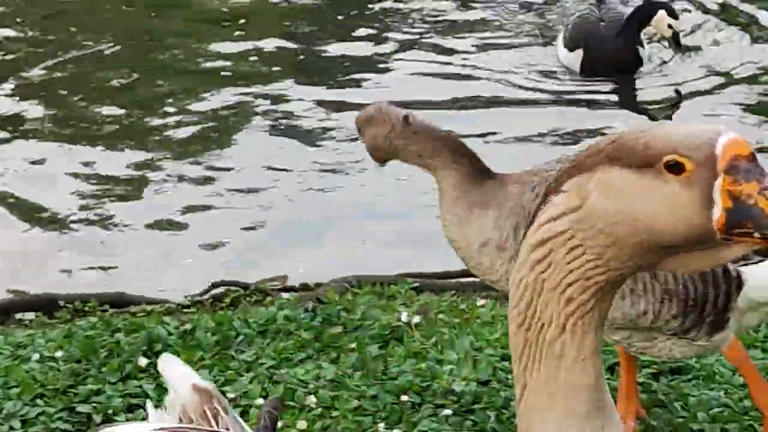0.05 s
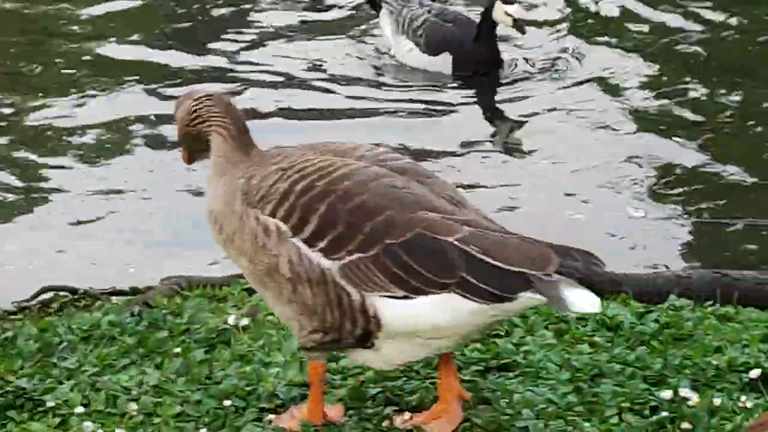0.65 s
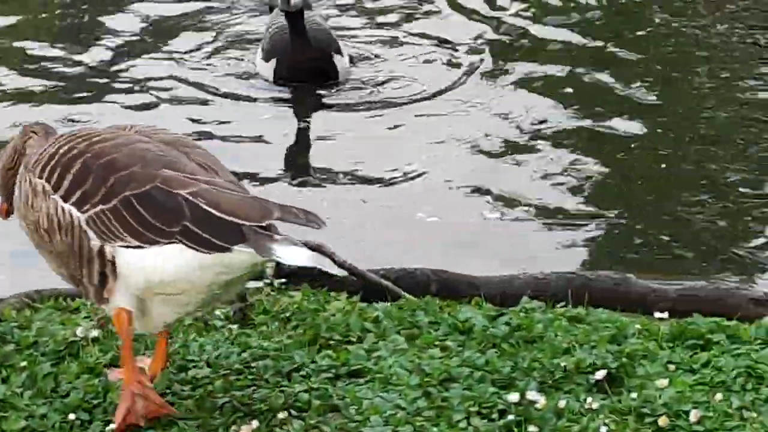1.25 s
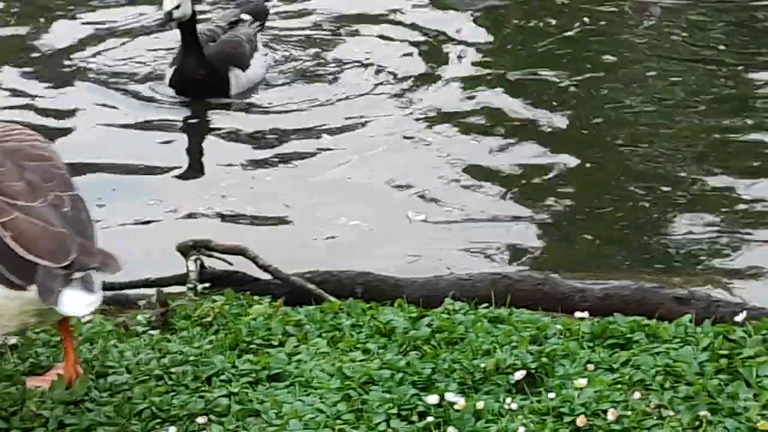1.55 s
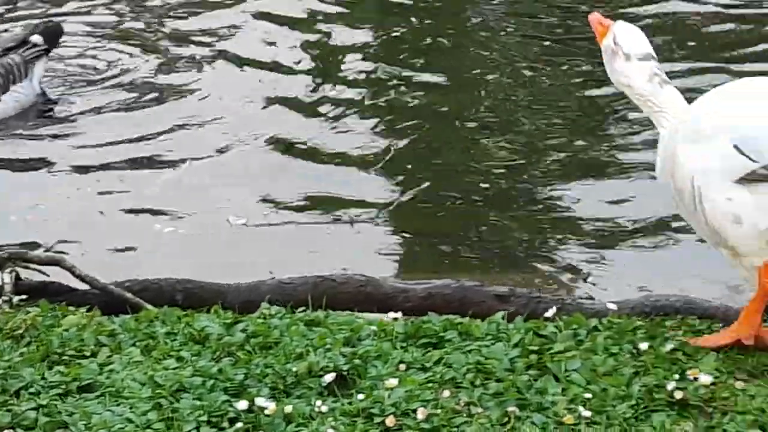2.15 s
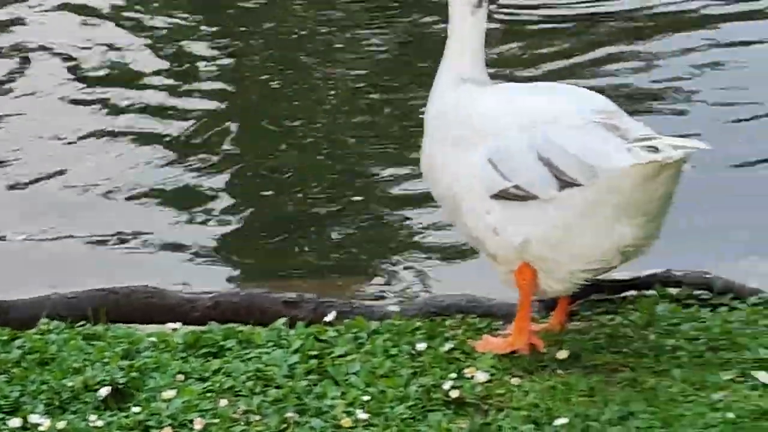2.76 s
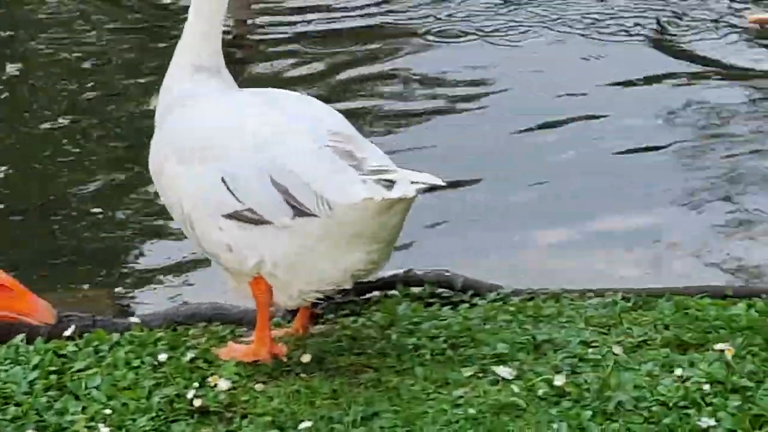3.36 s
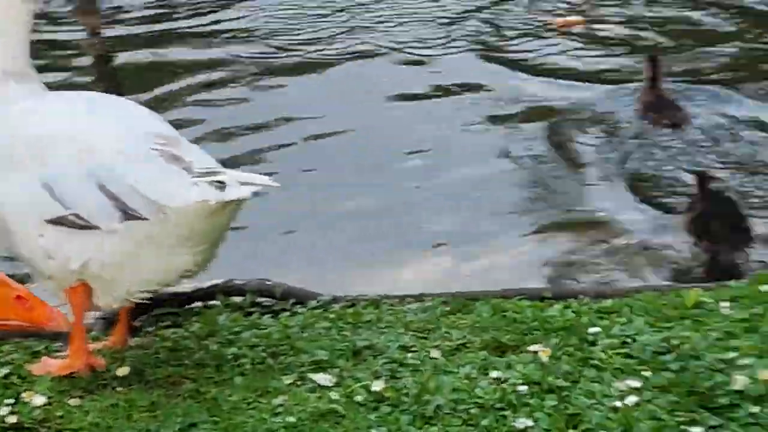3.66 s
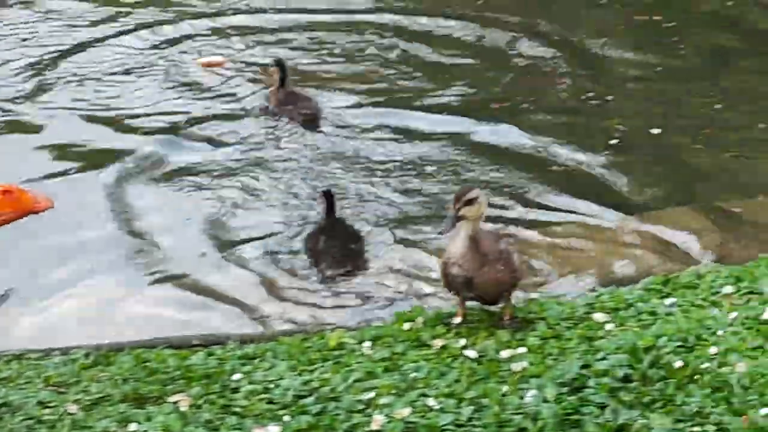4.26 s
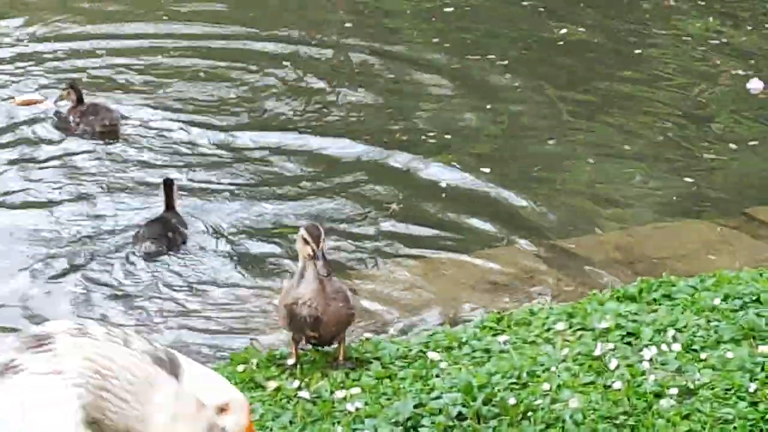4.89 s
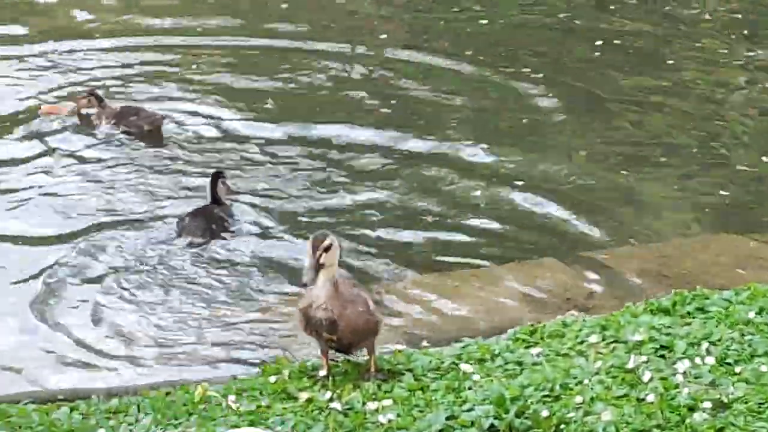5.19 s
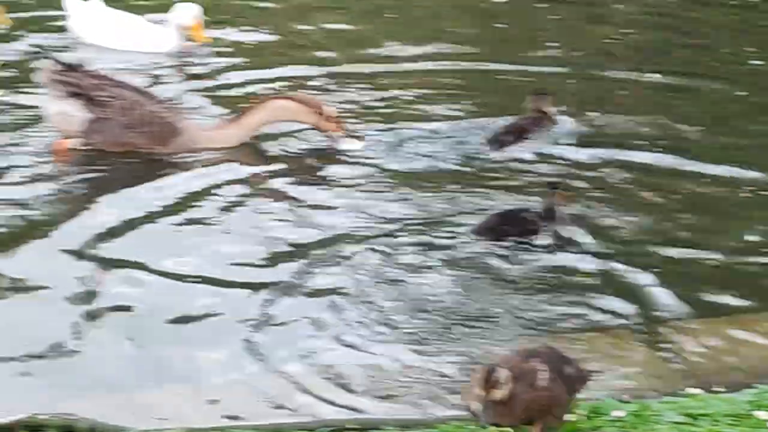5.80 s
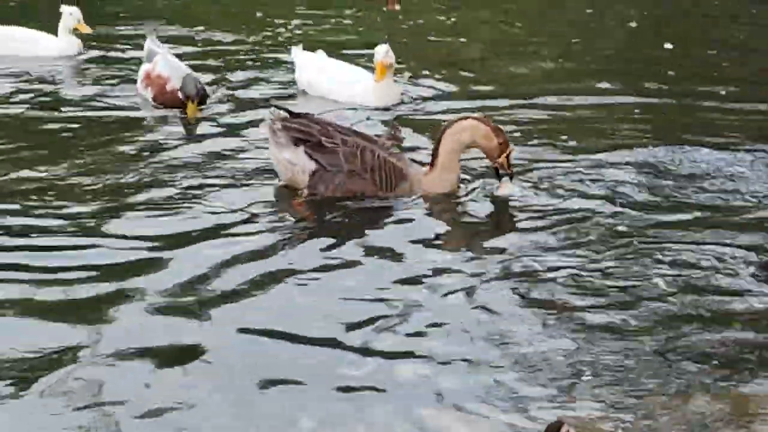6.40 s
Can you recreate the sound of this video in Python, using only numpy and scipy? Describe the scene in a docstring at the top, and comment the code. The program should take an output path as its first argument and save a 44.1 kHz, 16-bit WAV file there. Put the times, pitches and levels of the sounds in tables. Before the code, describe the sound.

An even outdoor hiss fills a park pond throughout, with a low rumble of distant traffic beneath it. For the first three seconds, scattered small drips and sharp watery ticks sound over faint lapping, the sharpest near 0.8 and 1.4 seconds. A few soft gulps come from the bank around 3 seconds. At about 3.4 seconds a duckling, off to the right, begins quick, high, slightly raspy peeps, each falling at its end. Ten come evenly, three or four a second, until 6 seconds, loudest at first and then more distant. From 3.7 seconds, ducklings paddle and dabble with a light bubbly wash, and drips cluster around 4.5 and 5.5 seconds. A larger water bird gives one short, quiet low note at about 5.1 seconds. A couple more drips and a last faint peep near 6.5 seconds finish it.

```python
"""A duckling gives a run of quick high peeps at a park pond, the harmonics of its syrinx filtered by
the resonances of throat and bill. Other ducklings paddle and dabble, and water laps, drips and gulps
at the bank as trapped air bubbles ring. A larger water bird gives one low note.
Distant traffic rumbles under an even outdoor hiss."""
import sys
import numpy as np
from scipy import signal
from scipy.fft import rfft, irfft
from scipy.io import wavfile
from scipy.ndimage import uniform_filter1d

SR = 44100
rng = np.random.default_rng(int(sys.argv[2]) if len(sys.argv) > 2 else 0)


def digitize_waveform(pressure):
    """Quantize a signal to 16-bit integers and store it at the path in sys.argv[1].

    Rows of a 2-D input are taken as channels; values are limited to [-1, 1].
    """
    field = np.atleast_2d(pressure).T
    bounded = np.clip(field, -1, 1)
    quanta = np.round(bounded * 32767).astype(np.int16)
    wavfile.write(sys.argv[1], SR, quanta)


N = 292824
TIME = np.arange(N) / SR
BINS = np.fft.rfftfreq(N, 1 / SR)
EAR_LAG_S = .00034   # sound from the pond reaches the right ear later
CUTOFF_HZ = 15800


def from_db(db):
    """Amplitude ratio of a level in decibels."""
    return 10 ** (np.asarray(db) / 20)


def rms_one(x):
    """Normalisation to unit rms."""
    return x / np.sqrt(np.mean(x ** 2) + 1e-20)


def in_time(rows, t=TIME):
    """Linear interpolation of each column of a curve at the times t."""
    s, *columns = np.transpose(rows)
    return [np.interp(t, s, column) for column in columns]


def at_hz(points, hz):
    """Interpolation of a spectrum on a log-frequency axis."""
    known_hz, values = np.transpose(points)
    return np.interp(np.log(np.maximum(hz, 1)), np.log(known_hz), values)


def bell(hz, centre_hz, octaves):
    """A Gaussian band of height 1 on a log-frequency axis."""
    return np.exp(-(np.log2(np.maximum(hz, 1) / centre_hz) / octaves) ** 2)


def coloured(x, spectrum):
    """Linear filtering by a spectrum in dB, at unit rms."""
    return rms_one(irfft(rfft(x) * from_db(at_hz(spectrum, BINS)), N))


def drift(rate_hz):
    """Random fluctuation: low-passed noise of unit rms."""
    return rms_one(irfft(rfft(rng.standard_normal(N)) / (1 + (BINS / rate_hz) ** 2), N))


def panned(x, pan_db):
    """Interaural level difference: left exceeds right by pan_db."""
    return x * from_db(np.array([[.5], [-.5]]) * pan_db)


def delayed(x, lag_s):
    """Propagation delay."""
    return np.interp(TIME - lag_s, TIME, x)


def stereo_noise(coherence):
    """Partly coherent white noise at two ears; coherence is one value or one per bin."""
    mid, side = rfft(rng.standard_normal((2, N)))
    return irfft(np.sqrt(1 + coherence) * mid + np.sqrt(1 - coherence) * side * [[1], [-1]], N)


def add(out, s, sound):
    """Superposition of a sound starting at s seconds."""
    at = max(int(s * SR), 0)
    out[..., at:at + sound.shape[-1]] += sound[..., :max(N - at, 0)]


def traffic():
    """A distant source gives a low rumble that is almost coherent at the two ears."""
    # Each row: frequency in Hz, relative spectral density in dB.
    spectrum = [(20, -6), (36, -16), (55, 4), (75, 1), (120, 1.5), (160, 1), (185, -5), (240, -5.5),
                (320, -13), (450, -23), (900, -71)]
    # Each row: time in seconds, relative level in dB.
    loudness = [(0, -47.5), (.6, -50.5), (1.3, -49.5), (1.7, -50), (3.0, -50.5), (4.4, -48), (5.0, -51.5),
                (5.7, -52.5), (6.3, -49)]
    return coloured(stereo_noise(0.97), spectrum) * from_db(in_time(loudness)[0] - 2.5)


def comb_gain(hz, t):
    """Interference with a close, inverted reflection; the small surface returns only treble."""
    # The echo shifts as the listener turns. Each row: time in seconds, delay in seconds, strength 0-1.
    reflection = [(0, .00042, 0.1), (.4, .000405, 0), (.85, 0.00037, 0.6), (1.35, 0.00039, 0.6),
                  (1.55, .00038, 0), (2.6, 0.00049, .03)]
    above_hz = 7300
    lag_s, strength = in_time(reflection, t)
    treble = hz ** 4 / (hz ** 4 + above_hz ** 4)
    return 1 - strength * treble * np.exp(-2j * np.pi * hz * lag_s)


def hollow_and_shade_gain(hz, t):
    """Resonance of a hollow and acoustic shadowing, both changing as the listener turns."""
    # Each row: resonance in Hz, half width in octaves, full gain in dB.
    resonances = [(4340, 0.035, 7), (5500, 0.049, 6)]
    # Each row: time in seconds, share of that gain from 0 to 1.
    hollowness = [(0, 1), (.65, 0.7), (1.4, 0.7), (1.6, 0.2)]
    # Each row: time in seconds, treble gain in dB.
    treble = [(0, -2), (.9, 6.5), (1.7, 4), (2.6, 8), (3.9, 6.5), (4.5, -2), (5.2, -8), (5.6, -7),
              (5.95, 8)]
    hollow_db = sum(gain_db * bell(hz, centre, width) for centre, width, gain_db in resonances)
    treble_db = in_time(treble, t)[0] * bell(hz, centre_hz=10900, octaves=0.27)
    return from_db(in_time(hollowness, t)[0] * hollow_db + treble_db)


def band_swell_db(hz, t):
    """Slow amplitude modulation of four separate bands of the hiss."""
    # One curve per band. Each row: time in seconds, gain at the band's centre in dB.
    middle = [(1.0, 6), (3.0, 4.5), (4.6, -2.5), (5.5, -7.5), (6.2, 3.5)]
    presence = [(0, -2.5), (.7, -1), (1.1, 3.5), (1.6, 3.5), (2.1, 2.5), (3.0, 3.5), (4.5, -1.5), (5.6, -3),
                (6.64, 1.5)]
    bright = [(.6, -4.5), (.85, 2), (1.6, 3.5), (2.6, -1), (3.9, -3), (4.5, 1.5), (5.2, -5), (5.65, -0.5),
              (6.64, -5)]
    air = [(0, 0.5), (2.0, -2), (2.9, 2), (4.4, 0), (5.3, 4.5), (6.3, -2.5)]
    return (in_time(middle, t)[0] * bell(hz, centre_hz=1240, octaves=0.33)
            + in_time(presence, t)[0] * bell(hz, centre_hz=3080, octaves=0.11)
            + in_time(bright, t)[0] * bell(hz, centre_hz=6770, octaves=0.18)
            + in_time(air, t)[0] * bell(hz, centre_hz=9600, octaves=0.14))


def hiss():
    """Broadband noise of the park, filtered by what lies near each ear of a turning listener."""
    # Each row: frequency in Hz, coherence between the ears from 0 to 1.
    coherence = [(300, 0.83), (700, 1), (1200, 0.027), (3000, 0.28), (7000, 0.073), (15000, 0.45)]
    # One spectrum per ear. Each row: frequency in Hz, relative spectral density in dB.
    left_spectrum = [(150, -5), (280, -7), (450, -3.5), (700, 0), (1500, -3), (1800, -3), (2050, -9),
                     (2380, 7), (2650, -8.5), (2950, 3.5), (3300, -7.5), (3800, -1.5), (4250, -4.5),
                     (5200, -4.5), (6300, -1), (7300, -5), (8050, -4.5), (8900, -8.5), (11000, -12),
                     (15500, -16.5)]
    right_spectrum = [(150, -5.5), (280, -5.5), (450, -11), (700, -1), (1130, -7), (1500, -2), (1900, 0),
                      (2350, -2), (2650, -2.5), (2930, 0), (3170, -2), (3500, 2.5), (4020, -2.5), (4380, 0),
                      (5850, -1), (6220, 1.5), (7050, -3.5), (7700, -5.5), (8400, -7), (11000, -21.5),
                      (15500, -16.5)]
    # Each row: time in seconds, relative level in dB.
    loudness = [(0, -48.5), (1.2, -49), (1.7, -49.5), (2.8, -49), (4.4, -47.5), (5.0, -47.5), (5.6, -49),
                (6.64, -48.5)]
    patchy_db, flutter_db = 1.3, 0.93
    left, right = stereo_noise(at_hz(coherence, BINS))
    left = coloured(left, left_spectrum) * from_db(2.5)
    right = coloured(np.roll(right, int(EAR_LAG_S * SR)), right_spectrum) * from_db(7.5)
    hz, t, spectra = signal.stft([left, right], SR, nperseg=2048)
    hz = hz[:, None]
    spectra[0] *= comb_gain(hz, t)
    spectra[1] *= hollow_and_shade_gain(hz, t)
    patches = uniform_filter1d(rng.standard_normal(spectra.shape), size=12, axis=1)
    patches = rms_one(uniform_filter1d(patches, size=14, axis=2))   # the colour shifts irregularly
    spectra *= from_db(band_swell_db(hz, t) + patchy_db * patches)
    noise = signal.istft(spectra, SR)[1][:, :N]
    return noise * from_db(in_time(loudness)[0] + flutter_db * drift(21.0))


def bubble(hz, cycles, rise):
    """A damped oscillator: a bubble loses 30 dB in `cycles` periods and sharpens near the surface."""
    age = np.arange(int(2 * cycles / hz * SR)) / SR * hz / cycles
    phase = 2 * np.pi * cycles * (age + rise * age ** 2 / 2)
    onset = 1 - np.exp(-2 * age * cycles)
    return np.sin(phase) * from_db(-30 * age) * onset


def bubbling(curve, count, low_hz, high_hz, cycles):
    """Superposition of random bubbles under a level curve; large ones ring lower, longer and softer."""
    out = np.zeros((2, N))
    for when, smallness, strength, place in rng.random((count, 4)):
        hz = low_hz * (high_hz / low_hz) ** smallness
        ring = bubble(hz, cycles, rise=0.093) * strength ** 2 * np.sqrt(hz / low_hz)
        add(out, when * N / SR, panned(ring, 10 * (place - .5)))
    out[1] = delayed(out[1], EAR_LAG_S)
    return rms_one(out) * from_db(in_time(curve)[0])


def lapping():
    """Air entrainment: water lapping at the bank traps heavily damped bubbles."""
    # Each row: time in seconds, relative level in dB.
    loudness = [(0, -69), (1.3, -66), (1.7, -61.5), (2.8, -62), (4.3, -58), (5.2, -64.5), (6.0, -56.5),
                (6.64, -67)]
    return from_db(6.5) * bubbling(loudness, count=2600, low_hz=607, high_hz=2290, cycles=4.7)


def paddling():
    """Paddling feet entrain small resonant bubbles and stir a surging wash of noise."""
    # The ducklings come near and pass. Each row: time in seconds, relative level in dB.
    loudness = [(0, -60), (3.3, -78), (3.7, -49), (4.1, -51), (4.5, -46.5), (4.64, -48.5), (4.8, -44.5),
                (5.0, -51.5), (5.5, -45.5), (6.2, -55.5), (6.45, -50), (6.64, -64)]
    # Each row: frequency in Hz, relative spectral density in dB.
    wash_spectrum = [(900, -44), (1350, -6), (1700, 7.5), (2300, -0.5), (2850, -12), (3450, 7.5),
                     (3850, -3), (4400, -2), (5500, 0.5), (7000, -22), (15000, -18)]
    surge_db = 1.8
    bubbles = bubbling(loudness, count=1500, low_hz=1390, high_hz=2560, cycles=9.7)
    wash = coloured(stereo_noise(0.033), wash_spectrum)
    wash *= from_db(in_time(loudness)[0] + surge_db * drift(12.0))
    return panned(from_db(-3.5) * bubbles + from_db(0.3) * wash, pan_db=-7.0)


def drops():
    """Impact and resonance: a drop or a dabbing bill splashes briefly and leaves a ringing bubble."""
    # Each row: start in seconds, relative level in dB, resonance in Hz.
    impacts = [(0.121, -42.5, 1500), (.404, -42, 1850), (0.4407, -38, 2400), (.4574, -37, 2900),
               (.667, -42, 1390), (.88, -41.5, 1520), (1.004, -46, 1130), (1.036, -42, 1400),
               (1.139, -43, 1950), (1.31, -43, 3200), (1.4, -33, 3000), (1.787, -37.5, 2880),
               (2.689, -37, 2410), (4.472, -38, 2270), (4.4944, -32, 2300), (4.581, -32.5, 2100),
               (4.916, -39, 1900), (5.147, -42, 1880), (5.376, -40, 2100), (5.407, -38, 2120),
               (5.427, -36.5, 2290), (5.465, -37.5, 1810), (5.5, -36, 2420), (5.619, -45, 2070),
               (5.661, -38, 2150), (5.708, -40, 1830), (5.727, -39, 1800), (6.1901, -38, 2330),
               (6.297, -37, 2270)]
    splash_share, splash_decay_s = 0.3, 0.0024
    out = np.zeros(N)
    for s, level_db, hz in impacts:
        ring = bubble(hz, cycles=19.6, rise=0.022)
        band = signal.butter(2, [hz / 2, hz * 2], "band", fs=SR, output="sos")
        noise = rms_one(signal.sosfilt(band, rng.standard_normal(SR // 10)))[:len(ring)]
        splash = splash_share * noise * np.exp(-TIME[:len(ring)] / splash_decay_s)
        add(out, s, from_db(level_db + 4.0) * (ring + splash))
    return panned(out, pan_db=-2.8)


def ticks():
    """Sharp ticks and small spatters are transients: short bursts of band-limited noise."""
    # Each row: start in seconds, relative level in dB, band centre in Hz, decay time in seconds.
    spatters = [(.1594, -35.5, 3570, 0.00083), (.2404, -43, 5400, .0007), (.5556, -38, 3500, .001),
                (.5634, -42, 5200, 0.0006), (.8122, -27.5, 4000, 0.00085), (3.908, -54, 12100, 0.011),
                (4.239, -35, 2290, 0.0013), (4.282, -52, 10500, .006), (4.412, -30, 1550, 0.0011),
                (4.5, -51, 12000, .007)]
    out = np.zeros((2, N))
    for s, level_db, hz, decay_s in spatters:
        age = TIME[:SR // 8] / decay_s
        burst = stereo_noise(0.29)[:, :SR // 8] * 2 * age * np.exp(-age)
        band = signal.butter(3, [hz / 1.6, min(hz * 1.55, CUTOFF_HZ)], "band", fs=SR, output="sos")
        add(out, s, from_db(level_db + 7.5) * signal.sosfilt(band, burst))
    return panned(out, pan_db=-5)


def gulps():
    """Cavity resonance: an air pocket closing at the bank rises in pitch as it dies away."""
    # Each row: start in seconds, first and last pitch in Hz, length in seconds, level in dB.
    pockets = [(0.649, 760, 910, 0.061, -47.5), (2.812, 630, 765, 0.043, -46.5),
               (2.911, 1264, 1430, 0.037, -45), (2.965, 237, 264, 0.041, -39.5),
               (2.999, 289, 693, 0.063, -46), (3.091, 626, 654, 0.019, -43.5),
               (3.917, 520, 587, 0.025, -50)]
    decay_db = 13.3
    out = np.zeros(N)
    for s, start_hz, end_hz, length_s, level_db in pockets:
        age = np.linspace(0, 1, int(length_s * SR))
        phase = 2 * np.pi * np.cumsum(start_hz * (end_hz / start_hz) ** age) / SR
        envelope = from_db(level_db - decay_db * age) * signal.windows.tukey(len(age), .3)
        add(out, s, envelope * np.sin(phase))
    return out


def register_flips(t, pitch, level_db):
    """Register change: the voice jumps to a thin, warbling high note and cracks on dropping back."""
    # Each row: start in seconds, length in seconds, pitch in Hz, relative level in dB.
    flips = [(3.368, 0.025, 3490, -34.5), (3.389, 0.024, 3390, -31), (3.41, 0.017, 3470, -35),
             (3.434, 0.013, 3333, -34), (3.689, .022, 3090, -43.5), (3.954, 0.03, 2860, -46)]
    flip_s, swell_s = 0.0023, 0.0051
    warble_hz, warble_depth = 48.2, 0.015
    crack_s, crack_hz, crack_depth = 0.0138, 112, 0.185
    for s, length_s, high_hz, high_db in flips:
        since, after = t - s, t - s - length_s
        flipped = np.clip(np.minimum(since, -after) / flip_s + .5, 0, 1)
        effort = np.clip(since / swell_s, 0, 1) * np.clip(1 - after / crack_s, 0, 1)
        warbling = high_hz * (1 - warble_depth * np.cos(2 * np.pi * warble_hz * since))
        crack = np.sin(2 * np.pi * crack_hz * np.maximum(after, 0))
        cracked = pitch * (1 - crack_depth * effort * crack)
        pitch = cracked + flipped * (warbling - cracked)
        level_db = level_db + effort * (high_db - level_db)
    return pitch, level_db


def peep(start, hold_s, fall_s, top_hz, held_db, falling_db, held_bright_db, falling_bright_db):
    """Frequency and amplitude modulation of one peep: a scoop, hold and fall, as a call for voice()."""
    # The fall eases on a ledge midway. Each row: share of its length, share of the top pitch.
    fall = [(0, 1), (.27, .92), (.42, .8), (.8, .71), (1, .56)]
    # The voice catches and its level dips. Each row: time in seconds, half length in seconds.
    catches = [(3.388, .0025), (3.407, 0.0034), (3.486, 0.0023), (3.673, 0.015), (3.694, 0.0026),
               (3.939, .006), (4.495, 0.0072), (4.758, .003), (4.78, .004), (4.797, .003), (5.05, 0.011),
               (5.34, .005), (5.938, 0.0063)]
    scoop_depth, scoop_s, climb = .3, .005, 0.0339
    attack_s, fade_db, catch_db = 0.0054, 7.5, 2
    release_share, fade_share = 0.15, 0.39   # of the fall's length
    age = np.arange(0, hold_s + fall_s, 1 / SR)
    t = start + age
    fallen = np.clip((age - hold_s) / fall_s, 0, 1)
    pitch = top_hz * (1 - scoop_depth * np.exp(-age / scoop_s)) * in_time(fall, fallen)[0]
    pitch *= 1 - climb * np.maximum(1 - age / hold_s, 0)
    released = np.minimum(fallen / release_share, 1)
    bright_db = held_bright_db + (falling_bright_db - held_bright_db) * released
    opening = np.maximum(1 - age / attack_s, 0)
    closing = np.maximum(1 - (1 - fallen) / fade_share, 0)
    level_db = held_db + (falling_db - held_db) * released - fade_db * (opening + closing)
    pitch, level_db = register_flips(t, pitch, level_db)
    level_db -= catch_db * sum(np.exp(-((t - s) / half_s) ** 2) for s, half_s in catches)
    return np.column_stack([t, pitch, level_db, bright_db])


def voice(calls, throat, roughness, wander, jitter, shimmer_db, rasp):
    """Source and filter: harmonics of the syrinx sweep through the resonances of the throat."""
    overtone_loss_db = 4.5   # per harmonic above the second
    waver = 1 + wander * drift(39.7)
    tremor = jitter * drift(306)
    flutter_db = shimmer_db * np.tanh(drift(130))
    turbulence = coloured(rng.standard_normal(N), throat)
    k = np.arange(1, 9)[:, None]
    flicker_db = 6 * np.array([drift(70) for _ in k])   # each harmonic flickers on its own
    out = np.zeros(N)
    for call, rough in zip(calls, roughness):
        # Each row of a call: time in seconds, pitch in Hz, level in dB, brightness in dB per harmonic.
        span = (TIME >= call[0][0]) & (TIME <= call[-1][0])
        pitch, level_db, bright_db = in_time(call, TIME[span])
        pitch = uniform_filter1d(pitch, size=130) * (waver[span] + rough * tremor[span])
        source_db = bright_db * np.minimum(k - 1, 2) - overtone_loss_db * np.maximum(k - 2, 0)
        gains = from_db(at_hz(throat, k * pitch) + source_db) * (k * pitch < CUTOFF_HZ)
        gains = gains / np.sqrt((gains ** 2).sum(0) / 2) * from_db(rough * flicker_db[:, span])
        harmonics = gains * np.sin(2 * np.pi * k * np.cumsum(pitch) / SR)
        tone = rms_one(harmonics.sum(0) * from_db(rough * flutter_db[span]))
        envelope = from_db(level_db) * signal.windows.tukey(len(pitch), .06)
        out[span] += (tone + rough * rasp * turbulence[span]) * envelope
    return out


def park(x):
    """Reverberation: banks and trees scatter back a decaying tail, different at each ear."""
    t60_s, swell_s = 0.53, 0.0067
    t = TIME[:SR // 2]
    tail = rng.standard_normal((2, len(t))) * from_db(-60 * t / t60_s) * np.minimum(t / swell_s, 1)
    return signal.fftconvolve(x[None], rms_one(tail) / np.sqrt(len(t)), axes=1)[:, :N]


def duckling():
    """Two-path interference: a reflection off the water beats against each gliding peep."""
    # Each row: start, hold and fall in seconds, top pitch in Hz, held and falling relative level in dB,
    # held and falling brightness in dB per harmonic up to the third, roughness from 0 to 1.
    peep_run = [(3.359, 0.094, 0.052, 2232, -43, -31, -1, -2, 0.44),
                (3.654, 0.065, 0.071, 2267, -40, -38.5, -5, 1.5, 0.43),
                (3.935, .061, 0.067, 2220, -38.5, -40, -3.5, 4, .32),
                (4.208, .034, .066, 2236, -33.5, -41, 1, 4, 0.3),
                (4.461, .049, 0.067, 2308, -41.5, -38.5, -11.5, -6, .65),
                (4.727, 0.047, 0.067, 2250, -40.5, -45, -4, 3, .65),
                (5.008, 0.033, 0.067, 2330, -46.5, -41.5, -7, 6, 0.53),
                (5.28, .044, .07, 2170, -47, -47, -4, -2, 0.77),
                (5.618, 0.032, .081, 2220, -50, -48.5, -15, -3, .85),
                (5.878, .043, 0.074, 2120, -45, -47, -9.5, -3, .7),
                (6.452, 0.038, 0.091, 2266, -53, -47.5, -16, 2, 0.83)]
    # Response of throat and bill. Each row: frequency in Hz, gain in dB.
    throat = [(1200, -27), (1750, -15), (2250, -1), (2900, 2), (3500, 6), (4400, 8), (5200, 9), (6200, -5),
              (6900, -8), (9000, -9), (10500, -12), (14000, -9), (16000, -38)]
    # Scattered sound grows as the duckling moves off. Each row: time in seconds, its gain in dB.
    scatter = [(3.4, -13), (4.2, -8), (4.6, -4), (5.9, 1), (6.64, 3)]
    echo_s, echo_gain = .0031, .3
    calls = [peep(*row[:-1]) for row in peep_run]
    roughness = [row[-1] for row in peep_run]
    peeps = voice(calls, throat, roughness, wander=0.00623, jitter=0.0286, shimmer_db=6.0, rasp=0.32)
    left = peeps + echo_gain * delayed(peeps, echo_s)
    right = delayed(peeps, EAR_LAG_S) + echo_gain * delayed(peeps, 1.6 * echo_s)
    scattered = park(peeps * from_db(in_time(scatter)[0]))
    return panned(np.array([left, right]) * from_db(1.5) + scattered, pan_db=-11)


def larger_bird():
    """Two overlapping pitches, filtered by one throat, make a low note from straight ahead."""
    # One contour per pitch. Each row: time in seconds, pitch in Hz, level in dB.
    contours = [
        [(5.048, 583, -61), (5.068, 644, -47), (5.082, 710, -45), (5.100, 575, -48)],
        [(5.085, 460, -48), (5.105, 485, -44.5), (5.122, 490, -49.5), (5.147, 410, -61)],
    ]
    # Each row: frequency in Hz, gain of the throat in dB.
    throat = [(450, -14), (680, 8), (980, -13), (1400, -10), (2000, 0), (3500, -30)]
    # The note brightens as the bill opens.
    calls = [np.column_stack([rows, np.linspace(-3.0, 0, len(rows))]) for rows in contours]
    return voice(calls, throat, [.5] * len(calls), wander=0, jitter=0.011, shimmer_db=-3.0, rasp=0.42)


def scene():
    """Superposition of the birds, the pond and the background."""
    birds = duckling() + larger_bird()
    water = lapping() + paddling() + drops() + gulps() + ticks()
    return birds + water + traffic() + hiss()


def record(dry):
    """A steep low-pass filter limits the bandwidth."""
    return irfft(rfft(dry) / (1 + (BINS / CUTOFF_HZ) ** 300), N)


dry = scene()
out = record(dry)
digitize_waveform(out)
```